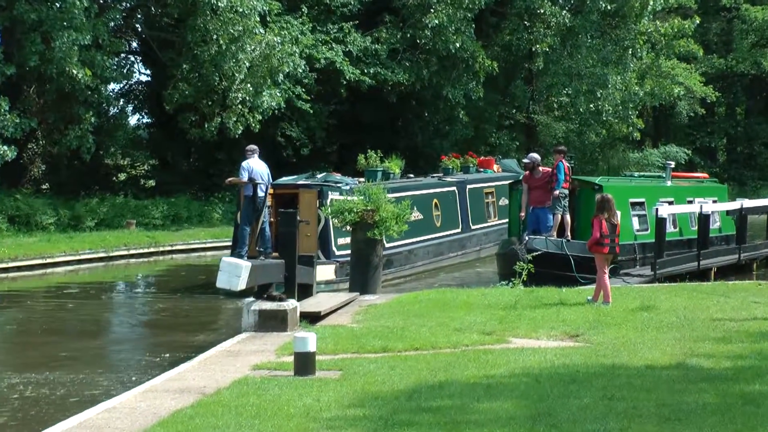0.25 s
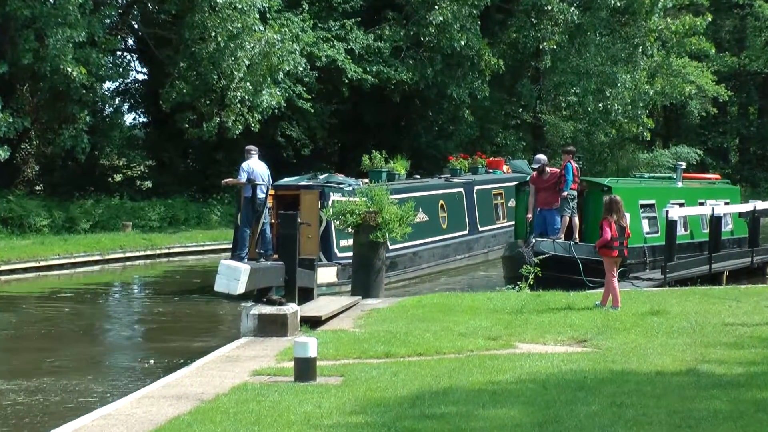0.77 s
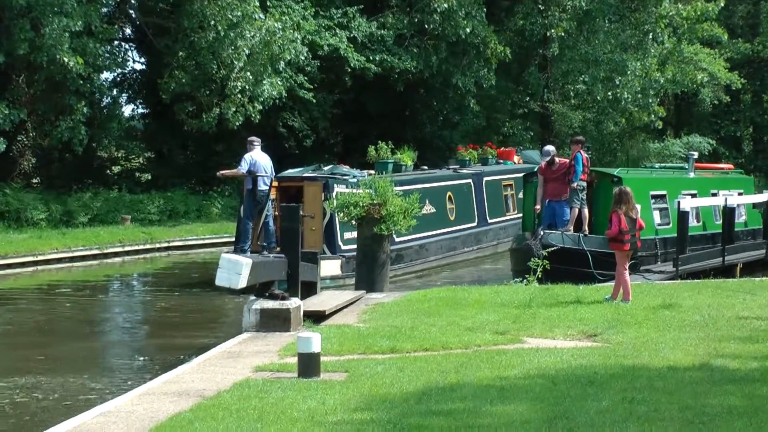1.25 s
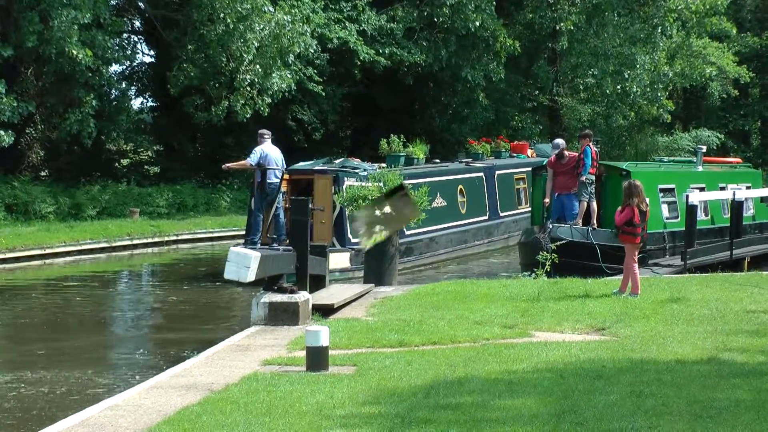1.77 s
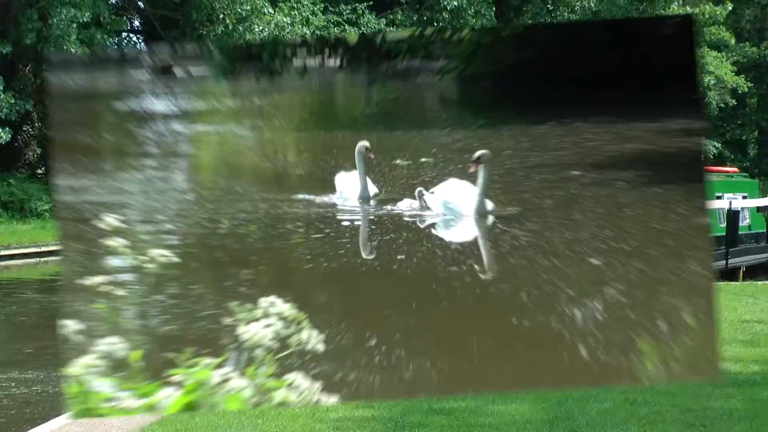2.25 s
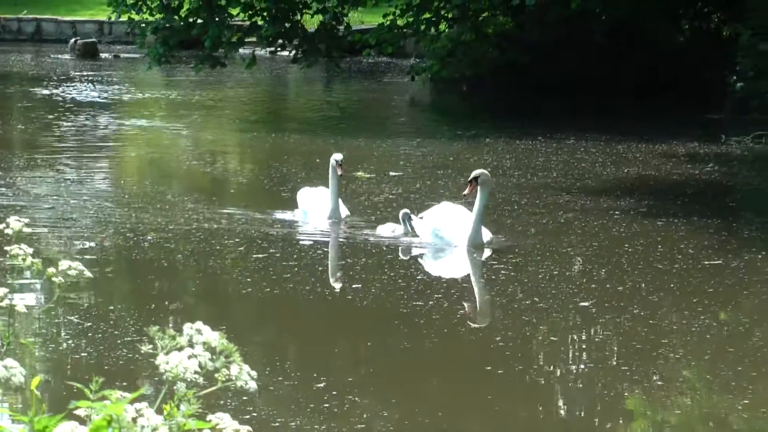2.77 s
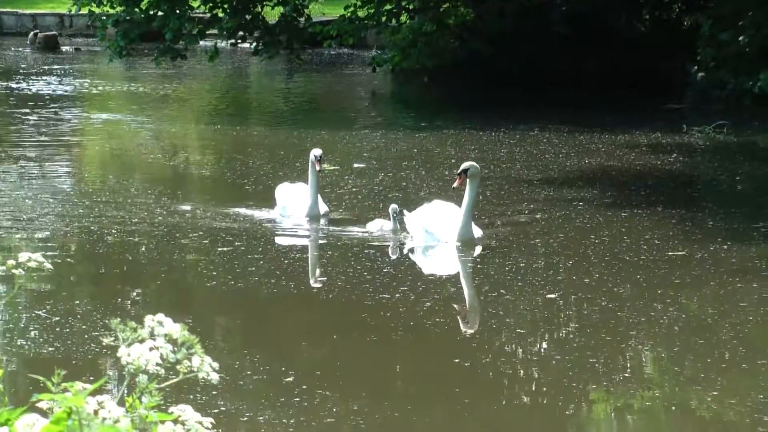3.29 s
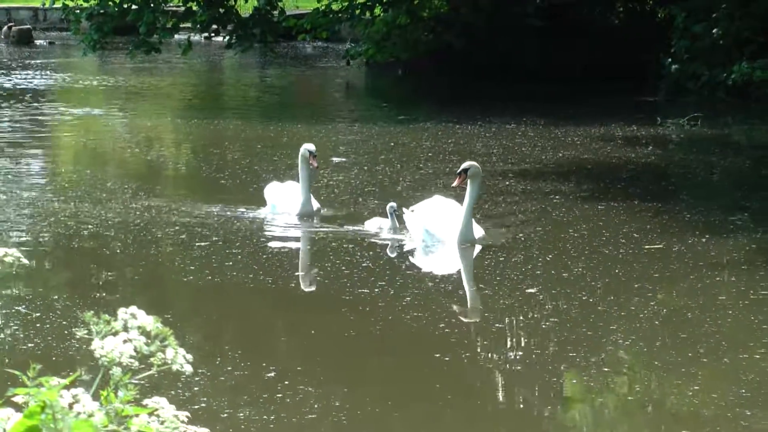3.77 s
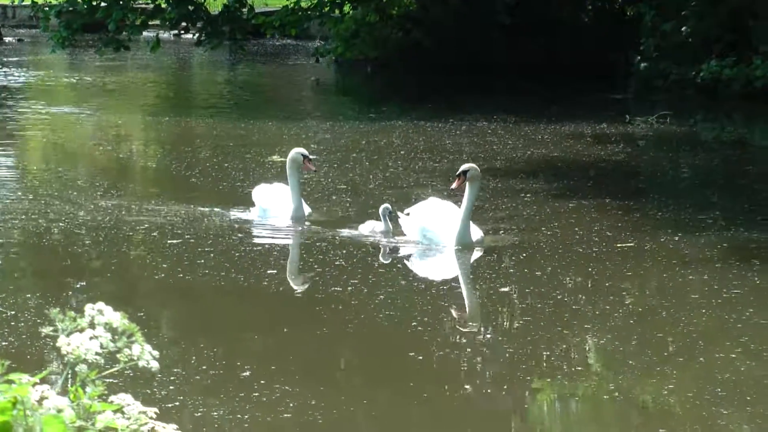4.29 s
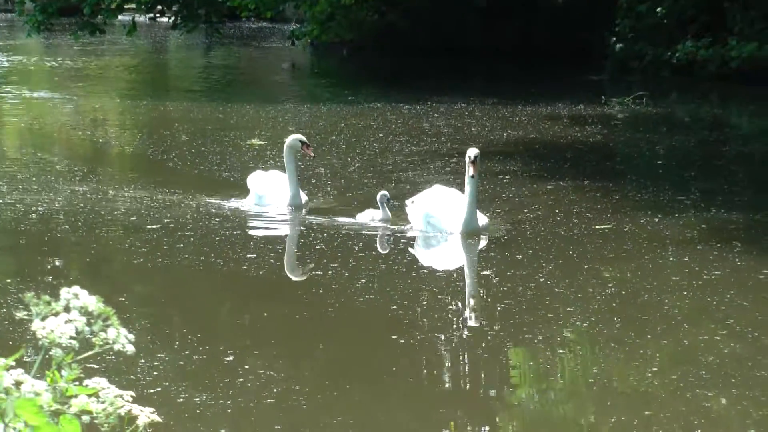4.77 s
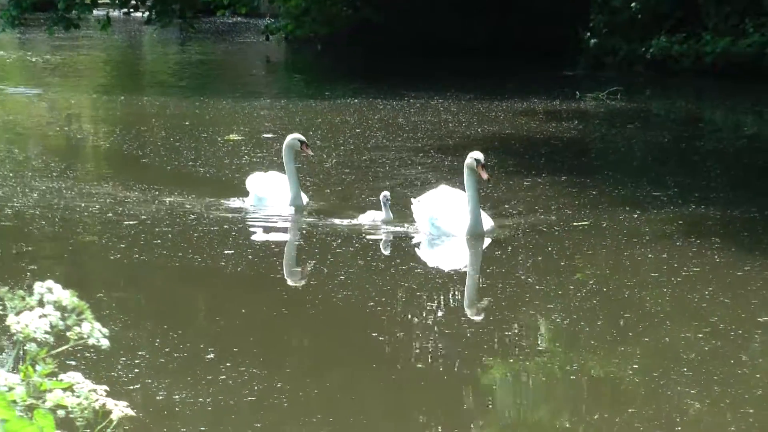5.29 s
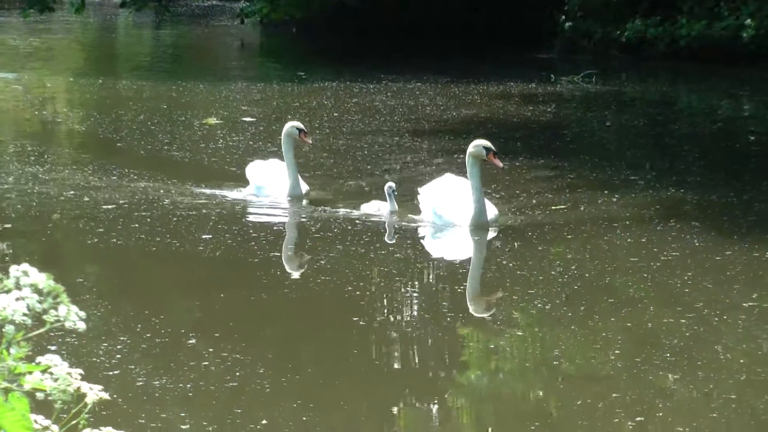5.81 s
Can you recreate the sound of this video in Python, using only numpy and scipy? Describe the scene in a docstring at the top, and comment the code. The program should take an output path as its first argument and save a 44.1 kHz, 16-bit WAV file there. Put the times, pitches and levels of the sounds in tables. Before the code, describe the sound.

Turbulent lock water roars for two seconds and dies away, leaving faint leaf hiss, distant rumble and echoing birdsong that swells at the end.

```python
"""Canal lock, then birds on a wooded bank

Water rushes through the sluices, turbulent noise full of ringing bubbles, and is gone within 2.5 s. The bank
fades in below it: a distant droning rumble and a faint hiss of leaves, both filtered noise. Thin high calls, a
finch's falling notes and a blackbird, louder at the end, are warbled gliding sines. The trees echo every call,
and a few small ticks (two droplet splashes, one dry snap), as diffuse stereo tails."""
import sys
import numpy as np
from scipy import signal
from scipy.fft import rfft, irfft
from scipy.io import wavfile
from scipy.ndimage import uniform_filter1d

SR = 44100
rng = np.random.default_rng(int(sys.argv[2]) if len(sys.argv) > 2 else 0)


def store_pcm(level_fs):
    """Save levels as 16-bit WAV."""
    pcm = np.round(np.clip(level_fs, -1, 1) * 32767).astype(np.int16)
    wavfile.write(sys.argv[1], SR, np.atleast_2d(pcm).T)


N = 266805
T = np.arange(N) / SR  # time [s]
TOP_HZ = 14600  # upper limit of the overtones and of the microphone channel
RUSH_END_S = 2.46  # the water is silent from here on


def undb(db):
    """Decibels to gain."""
    return 10 ** (np.asarray(db) / 20)


def level(x, db):
    """Scale to an rms level."""
    return x * undb(db) / np.sqrt(np.mean(x ** 2))


def at(points, f):
    """Read (frequency [Hz], value) points on a log-frequency axis."""
    knots, values = np.transpose(points)
    return np.interp(np.log(f + 1), np.log(knots), values)


def walk(rate):
    """Random levels, rate of them a second, smoothed twice and scaled to an rms of 1."""
    k = max(int(SR / rate), 2)
    steps = np.repeat(rng.standard_normal(N // k + 1), k)[:N]
    return level(uniform_filter1d(uniform_filter1d(steps, k), k), 0)


def add(track, start, x):
    """Mix a short sound in at a time."""
    i = int(np.clip(start * SR, 0, N - 1))
    track[..., i:i + x.shape[-1]] += x[..., :N - i]


def place(x, pan_db):
    """Put a mono sound between left (positive) and right (negative)."""
    return x * undb(np.array([[pan_db], [-pan_db]]) / 2)


def colour(pair, spectrum, width, pan):
    """Give two unrelated white sounds a spectrum and a stereo image, as mid and side."""
    f = np.fft.rfftfreq(N, 1 / SR)
    mid, side = rfft(pair) * undb(at(spectrum, f))
    side = side * undb(at(width, f))
    lean = undb(at(pan, f) / 2)
    return irfft(np.array([(mid + side) * lean, (mid - side) / lean]), N)


def churn(flicker_db, rate):
    """Two white noises whose half-octave bands flicker in level, each band on its own."""
    f = np.fft.rfftfreq(N, 1 / SR)
    band = np.floor(2 * np.log2(np.maximum(f / 80, 1)))
    white = rfft(rng.standard_normal((2, N)))
    total = np.zeros((2, N))
    for b in np.unique(band):
        total += irfft(white * (band == b), N) * undb(flicker_db * walk(rate))
    return level(total, 0)


def bubble(hz, cycles, rise, onset=0):
    """A pocket of air rings briefly, rising in pitch as it nears the surface; onset is the share spent swelling."""
    life = cycles / hz  # s
    age = np.arange(int(life * SR) + 2) / (life * SR)
    ring = np.sin(2 * np.pi * cycles * age * (1 + rise * age / 2))
    return ring * np.exp(-np.log(100) * np.abs(age - onset))


def froth(count, cycles):
    """Bubbles of all sizes, scattered over time and from left to right; higher ones are stronger."""
    pair = np.zeros((2, N))
    for when, size, side in rng.random((count, 3)):
        hz = 350 * (9000 / 350) ** size
        mid_side = [1, 2 * np.cos(np.pi * side)]
        add(pair, when * RUSH_END_S, np.outer(mid_side, hz * bubble(hz, cycles, 0.32)))
    return pair / np.std(pair[0, :int(RUSH_END_S * SR)])


def sluice(froth_db=-4, bass_db=.5, heave_db=0.3, bass_sag_db_per_s=1.0):
    """Turbulent water and its bubbles over a surging bass, dying away as the lock is left behind."""
    # spectrum of the water: (frequency [Hz], relative level per Hz [dB])
    water_spectrum = [(15, -52), (25, -24), (42, -14), (59, -16.5), (86, -6.5), (156, -1), (225, 0),
                      (310, -1.5), (411, -5), (855, -3), (1150, -7.5), (1650, -10.5), (2440, -16),
                      (4110, -17), (6580, -22.5), (7120, -23), (8550, -31.5), (10000, -36.5),
                      (12200, -46.5), (13400, -85)]
    # its stereo width: (frequency [Hz], side against mid [dB])
    water_width = [(40, -6), (130, -19.5), (300, -18), (700, -12.5), (1400, -6.5), (3000, -9.5),
                   (8000, -6.5)]
    # its lean: (frequency [Hz], left minus right [dB])
    water_pan = [(200, -0.3), (700, -0.5), (1400, -3.5), (2800, -5.5), (5500, -2), (9000, -3), (12000, 21)]
    # surges: (time [s], width [s], lift of the whole rush [dB], extra lift of the bass [dB])
    surges = [(.24, 0.14, 0, 6), (.92, 0.1, 0.8, 0.5)]
    # single large bubbles: (time [s], pitch [Hz], length [cycles], peak before panning [dB])
    plops = [(.865, 270, 21, -25.5), (1.59, 156, 18, -28), (1.714, 970, 31, -18.5)]
    rush_db, release_s = -26, 0.16
    fade_start_s, fade_db_per_s2 = 1.601, 36.5  # the fade steepens as it goes

    flow_db = rush_db - fade_db_per_s2 * np.maximum(T - fade_start_s, 0) ** 2
    low_db = bass_db - bass_sag_db_per_s * T + heave_db * walk(10.0)
    for when, width, lift_db, low_lift_db in surges:
        swell = np.exp(-((T - when) / width) ** 2)
        flow_db = flow_db + lift_db * swell
        low_db = low_db + low_lift_db * swell

    white = churn(flicker_db=1.27, rate=16.4) + undb(froth_db) * froth(count=6000, cycles=8.0)
    water = colour(white, water_spectrum, water_width, water_pan)
    bass = signal.sosfiltfilt(signal.butter(2, 220, fs=SR, output="sos"), water)
    water = water + bass * (undb(low_db) - 1)
    release = np.clip((RUSH_END_S - T) / release_s, 0, 1)
    water = water / np.std(water[:, :2 * SR]) * undb(flow_db) * release
    for start, hz, cycles, peak_db in plops:
        plop = undb(peak_db) * bubble(hz, cycles, 0.067, onset=0.27)
        add(water, start, place(plop, -1.4))
    return water


def trees(x, wet_db, t60, pan_db):
    """Trunks scatter a call into a diffuse tail, different on each side; leaves swallow its highest treble."""
    leaf_cut_hz = 9600
    t = T[:SR]
    tail = rng.standard_normal((2, SR)) * undb(-60 * t / t60) * (1 - np.exp(-t / .008))
    tail = tail / np.sqrt(np.sum(tail ** 2, axis=1, keepdims=True))
    tail = signal.sosfilt(signal.butter(8, leaf_cut_hz, fs=SR, output="sos"), tail)
    echo = signal.fftconvolve(x[None], tail, axes=1)[:, :N]
    return place(x, pan_db) + undb(wet_db) * echo


def ticks(decay_s=0.005):
    """Tiny soft clicks of noise, each dull above its own edge, scattered by the trees: two small droplet
    splashes in the rush, then one dry snap."""
    # (time [s], noise rms before the click's envelope [dB], upper edge [Hz])
    snaps = [(.357, -27, 8300), (1.869, -25, 2600), (3.597, -40, 5930)]
    out, t = np.zeros(N), T[:SR // 20]
    for start, db, edge_hz in snaps:
        dull = signal.butter(4, edge_hz, fs=SR, output="sos")
        snap = level(signal.sosfilt(dull, rng.standard_normal(len(t))), 0)
        add(out, start, undb(db) * snap * np.sqrt(t / decay_s) * np.exp(-t / decay_s))
    return trees(out, wet_db=0, t60=0.5, pan_db=4)


def bend(length, first, middle, last):
    """A pitch that bends smoothly through three points."""
    curve = np.polyfit([0, .5, 1], [first, middle, last], 2)
    return np.polyval(curve, np.linspace(0, 1, int(length * SR)))


def slurs(rows):
    """Notes that glide quickly at first, then ease into their last pitch."""
    lead = .6  # share of the glide that is done by the middle
    return [(start, bend(length, first, first + lead * (last - first), last), db, rough)
            for start, length, first, last, db, rough in rows]


def song(notes, warble_hz, depth, flutter_db, overtones=None, octave_db=None, count=7, shimmer_db=3,
         rasp=0.574, edge=0.099):
    """Whistles from (start, pitch curve, level, warble): the syrinx warbles, any overtones shimmer.

    Where there are overtones, harshness adds the octave; edge is the share of a note spent swelling.
    """
    out = np.zeros(N)
    warble = np.sin(2 * np.pi * warble_hz * T) + rasp * walk(600)
    shimmer = [walk(90) for k in range(2, count + 1)] if overtones else []
    for start, hz, db, rough in notes:
        u = np.linspace(0, 1, len(hz))
        span = (int(start * SR) + np.arange(len(hz))) % N
        hz = hz * (1 + depth * rough * warble[span])
        phase = 2 * np.pi * np.cumsum(hz) / SR
        swell = np.sin(np.pi / 2 * np.clip(np.minimum(u, 1 - u) / edge, 0, 1))
        wave = np.sin(phase)
        for k, wander in enumerate(shimmer, 2):
            strength = undb(at(overtones, k * hz) + shimmer_db * wander[span])
            wave = wave + strength * (k * hz < TOP_HZ) * np.sin(k * phase)
        if overtones:
            wave = wave + undb(octave_db) * rough ** 2 * np.sin(2 * phase)
        add(out, start, np.sqrt(2) * undb(db) * swell * wave)
    return out * undb(flutter_db * walk(70))


def thin_calls(trill_warble=0.62):
    """Small birds: warbling trills level in pitch, and faint sinking whistles."""
    # trills: (start [s], length [s], pitch [Hz], level [dB])
    trill_rows = [(1.023, 0.14, 7250, -46.5), (1.165, 0.35, 7160, -48.5)]
    # whistles: (start [s], length [s], start pitch [Hz], end pitch [Hz], level [dB], warble [0-1])
    whistle_rows = [(2.33, .05, 6870, 6750, -70, 0.4), (2.48, 0.097, 6900, 6460, -73, 0.2),
                    (2.795, 0.038, 7140, 6700, -67, 0.4), (2.945, 0.11, 6570, 6500, -79, .1),
                    (3.278, 0.056, 7000, 6650, -65, 0.4), (3.39, 0.1, 6650, 6580, -70, .1),
                    (3.615, 0.06, 7170, 6760, -66, 0.3)]
    trills = [(start, np.full(int(length * SR), hz), db, trill_warble)
              for start, length, hz, db in trill_rows]
    return song(trills + slurs(whistle_rows), warble_hz=132.4, depth=0.0408, flutter_db=3.5)


def bank(air_db=-46.5):
    """Distant rumble with a few droning resonances, under a faint hiss of leaves, all shaped noise."""
    # spectrum of the air: (frequency [Hz], relative level per Hz [dB])
    air_spectrum = [(15, -72), (30, -28), (55, -6), (91, 1), (208, 1.5), (300, -2), (386, -5.5), (560, -11),
                    (850, -16), (1150, -22), (1500, -28), (2300, -25.5), (4500, -42), (6600, -26.5),
                    (8300, -56.5), (12000, -73)]
    # its stereo width: (frequency [Hz], side against mid [dB])
    air_width = [(40, -13), (130, -23.5), (400, -13.5), (1400, -2), (8000, -19)]
    # its lean: (frequency [Hz], left minus right [dB])
    air_pan = [(200, .2), (4000, .5)]
    # resonances of the rumble: (pitch [Hz], width [Hz], rms before the fade-in [dB])
    drones = [(92.2, 3.4, -60.5), (184, 86, -66), (396, 49, -62.5), (744, 120, -60)]
    air = level(colour(churn(flicker_db=0.48, rate=8), air_spectrum, air_width, air_pan), air_db)
    f = np.fft.rfftfreq(N, 1 / SR)
    for hz, width, db in drones:
        resonance = 1 / (1 + (2 * (f - hz) / width) ** 2)
        ring = irfft(rfft(rng.standard_normal(N)) * resonance, N)
        air = air + level(ring, db)
    return air * np.clip((T - 1.9) / 0.5, 0, 1)


def chorus(count, low_hz, high_hz, db, growth_db_per_s, start_s=2.3):
    """Many birds far off: short, steep random chirps, up and down, growing louder."""
    notes = []
    for k, (when, length, pitch, glide, size) in enumerate(rng.random((count, 5))):
        hz = low_hz * (high_hz / low_hz) ** pitch
        ratio = 1 + 0.462 * (glide - .5)
        after = (k + when) / count * (T[-1] - start_s)
        curve = bend(0.01188 + 0.0253 * length, hz / ratio, hz, hz * ratio)
        notes.append((start_s + after, curve, db + growth_db_per_s * after - 6 * size, .3))
    return song(notes, warble_hz=77.0, depth=0.06, flutter_db=1.5)


def finch(run_warble=0.8):
    """Single slurs around two runs of one repeated falling note, the second run quicker and louder."""
    # single slurs: (start [s], length [s], start pitch [Hz], end pitch [Hz], level [dB], warble [0-1])
    single_rows = [(2.395, 0.035, 3620, 4270, -62, 1), (2.552, 0.033, 4280, 4730, -60, 0.6),
                   (2.752, 0.022, 3300, 4410, -60, 0.96), (2.91, .025, 3700, 4600, -66, 0.74),
                   (3.16, 0.032, 2650, 3170, -61.5, .6), (3.18, 0.024, 3370, 4400, -61.5, 0.9),
                   (3.292, 0.037, 4620, 4440, -60.5, 0.16), (3.435, 0.028, 3920, 2750, -61, 0.6),
                   (3.535, 0.065, 4880, 5160, -58.5, 0.15), (3.612, 0.03, 4400, 4320, -54, 0.37),
                   (3.633, 0.014, 3520, 3330, -61, 0.1), (3.845, 0.084, 3240, 4430, -60.5, 0.9),
                   (4.138, 0.021, 3150, 3970, -55.5, 0.37), (4.222, 0.03, 3270, 4100, -57.5, 0.3),
                   (4.395, 0.06, 4480, 4640, -49.5, 0.18), (4.435, 0.043, 4550, 3670, -54, 0.85),
                   (4.47, 0.035, 4000, 2850, -62, 0.7), (4.558, .022, 5700, 6570, -59, 0.5),
                   (4.575, 0.16, 6600, 6770, -58, 0.14), (5.14, 0.024, 3370, 4880, -63, .7),
                   (5.203, 0.041, 4570, 6620, -58, 1), (5.235, 0.058, 6370, 6820, -57, 0.6),
                   (5.25, 0.019, 3150, 3700, -62.5, 0.5), (5.308, 0.03, 3990, 4770, -52, 1)]
    # runs: (start [s], period [s], note length [s], start pitch [Hz], end pitch [Hz], level [dB])
    run_rows = [(3.701, .174, .087, 7130, 4510, -61), (5.389, .0915, .055, 5760, 3860, -53)]
    # number of notes in each run
    run_counts = [4, 7]
    runs = []
    for (start, period, length, first, last, db), count in zip(run_rows, run_counts):
        runs += [(start + k * period, length, first, last, db, run_warble) for k in range(count)]
    return song(slurs(single_rows + runs), warble_hz=139.8, depth=0.073, flutter_db=2.0)


def soft_slurs():
    """The blackbird's quiet opening phrase, each note easing in and out."""
    # (start [s], length [s], start pitch [Hz], end pitch [Hz], level [dB], warble [0-1])
    phrase = [(2.572, 0.024, 2010, 2900, -57, 0.6), (2.614, 0.02, 2930, 2050, -57, 0.7),
              (2.83, .05, 2500, 2220, -70, 0.7), (2.92, 0.042, 2300, 2700, -65, .6),
              (3.02, 0.022, 2150, 1900, -65, .3), (3.08, 0.065, 1720, 1735, -66.5, 0.2),
              (3.10, 0.039, 2480, 2350, -62.5, 0), (3.328, 0.069, 2270, 1950, -57.5, 0.04),
              (3.48, .09, 1750, 1700, -66, 0.24), (3.71, 0.038, 2123, 1944, -56.5, 0.5),
              (3.83, 0.093, 1830, 2020, -61.5, 0.3), (3.915, 0.125, 1986, 1984, -57, 0.08),
              (4.07, 0.068, 2025, 2175, -57.5, 0.07), (4.19, 0.089, 2560, 2710, -69, 0),
              (4.32, 0.047, 2614, 2230, -55, 0.3), (4.37, 0.072, 2270, 2334, -57.5, 0.2),
              (4.51, 0.038, 2530, 2030, -56.5, 0.3), (4.62, 0.15, 1884, 1960, -57, 0.28),
              (4.765, 0.062, 1920, 2110, -59.5, 0.5), (4.82, 0.15, 1828, 1786, -56, 0.14),
              (5.0, 0.068, 1740, 1810, -63, 0.26), (5.07, 0.099, 2050, 2470, -57, 1),
              (5.15, 0.1, 2420, 1940, -57, 0.9)]
    return song(slurs(phrase), warble_hz=61.4, depth=0.085, flutter_db=0.2, edge=0.26)


def buzz(start, length, hz, db, rise):
    """A rasping note that holds its pitch, then flicks upward as it fades."""
    flick_at, fade_db, warble = 0.48, 17, .5  # share of the note, dB, 0-1
    flick = np.interp(np.linspace(0, 1, int(length * SR)), [flick_at, 1], [0, 1])
    return start, hz * (1 + rise * flick), db - fade_db * flick, warble


def arch(start, length, crest_hz, db):
    """A note that climbs to a rounded crest, then fades as it drops."""
    crest, sag, fall = 0.68, 0.115, 0.16  # share of the note; shares of the crest pitch
    fade_db, warble = 2.5, 0.3
    u = np.linspace(0, 1, int(length * SR))
    climb = np.interp(u, [0, crest], [1, 0])
    drop = np.interp(u, [crest, 1], [0, 1])
    return start, crest_hz * (1 - sag * climb ** 2 - fall * drop ** 2), db - fade_db * drop, warble


def high_caller():
    """One small bird calls first in buzzes, then in hoarse arches that end up louder."""
    # buzzes: (start [s], length [s], pitch [Hz], level [dB], closing rise [share of the pitch])
    buzz_rows = [(2.934, .11, 7980, -50.5, 0.15), (3.383, .11, 7790, -51, 0.17),
                 (4.353, 0.14, 7700, -51, 0.12)]
    # arches: (start [s], length [s], crest pitch [Hz], level [dB])
    arch_rows = [(4.619, 0.21, 8450, -53.5), (4.975, 0.18, 8160, -52), (5.282, 0.15, 9140, -46),
                 (5.30, 0.17, 8030, -52.5), (5.576, 0.125, 8950, -39.5), (5.876, 0.11, 8850, -39.5)]
    buzzes = song([buzz(*row) for row in buzz_rows], warble_hz=115.5, depth=0.039, flutter_db=1.5,
                  rasp=1.2, edge=0.36)
    arches = song([arch(*row) for row in arch_rows], warble_hz=113.5, depth=0.036, flutter_db=2.5,
                  rasp=1.1, edge=.15)
    return buzzes + arches


def blackbird(throb_hz=53, throb_drift=.15):
    """Four loud notes with thin overtones; they throb unevenly and are harsher the higher they go."""
    # closing notes, each a curve of (time [s], pitch [Hz], level before the throb [dB], throb [0-1])
    closing_notes = [
        [(5.25, 1710, -62, 0.04), (5.305, 1716, -46.5, 0), (5.375, 1776, -45, .4), (5.432, 1700, -50, 0.4)],
        [(5.488, 1780, -48, 0), (5.515, 1840, -50, .3), (5.535, 1840, -49, 1), (5.602, 1787, -38, .9),
         (5.636, 1704, -50, .9)],
        [(5.653, 2510, -40, 0.1), (5.685, 2516, -33, 0.4), (5.72, 2770, -37, 0.9), (5.75, 3006, -41, .5),
         (5.778, 2970, -50, .5)],
        [(5.845, 2450, -41, 0.5), (5.885, 2400, -32, 0.76), (5.935, 2350, -29.5, 1), (5.965, 2007, -30.5, 0.5),
         (5.995, 1993, -30, 0), (6.065, 2026, -41.5, 0)],
    ]
    # overtones by where they fall: (frequency [Hz], strength against the fundamental [dB])
    overtone_curve = [(3500, -43), (4700, -26), (6000, -38), (7000, -23), (10000, -30.5), (12000, -23),
                      (13200, -36), (14500, -40)]
    pure_hz, harsh_hz, pure_warble = 2400, 3030, 0.12
    notes = []
    beat = np.abs(np.sin(np.pi * np.cumsum(throb_hz * (1 + throb_drift * walk(30))) / SR))
    for curve in closing_notes:
        t = np.arange(curve[0][0], curve[-1][0], 1 / SR)
        s, *columns = np.transpose(curve)
        hz, db, throb = (np.interp(t, s, column) for column in columns)
        dip = np.clip(throb, 0, .95) * (1 - np.interp(t, T, beat))
        db = db + 20 * np.log10(1 - dip)
        rough = np.interp(hz, [pure_hz, harsh_hz], [pure_warble, 1])
        notes.append((s[0], hz, db, rough))
    return song(notes, warble_hz=95.0, depth=0.0323, flutter_db=1.5, overtones=overtone_curve,
                octave_db=0.5, shimmer_db=4.5, rasp=1.57)


def birds():
    """Thin calls and finch to the left, blackbird to the right, chorus and twitter deeper in the wood."""
    far = chorus(count=230, low_hz=1900, high_hz=4970, db=-69.0, growth_db_per_s=0.95)
    twitter = chorus(count=70, low_hz=3700, high_hz=6260, db=-68.5, growth_db_per_s=5, start_s=4.1)
    return (trees(thin_calls(), wet_db=-2.0, t60=0.87, pan_db=5.0)
            + trees(far + twitter, wet_db=5.0, t60=0.22, pan_db=-2.0)
            + trees(finch(), wet_db=3.5, t60=0.84, pan_db=5.0)
            + trees(soft_slurs(), wet_db=0.5, t60=0.95, pan_db=-6)
            + trees(high_caller(), wet_db=-1.5, t60=0.57, pan_db=0.0)
            + trees(blackbird(), wet_db=-5, t60=0.64, pan_db=-5))


def scene():
    """The lock, then the bank and its birds."""
    return sluice() + ticks() + birds() + bank()


def record(dry):
    """The camera's microphone channel cuts the top with a steep low-pass."""
    return signal.sosfilt(signal.ellip(8, .2, 70, TOP_HZ, fs=SR, output="sos"), dry)


dry = scene()
out = record(dry)
store_pcm(out)
```